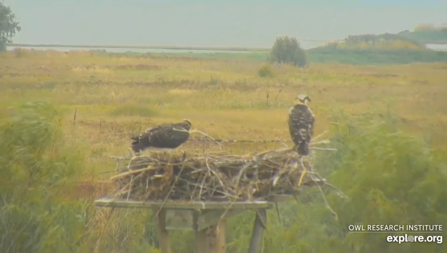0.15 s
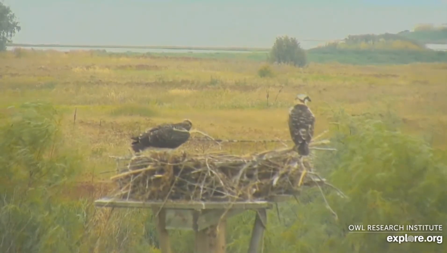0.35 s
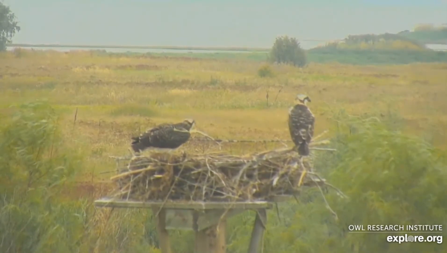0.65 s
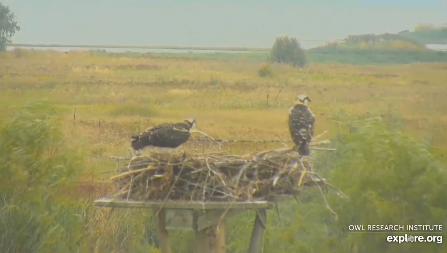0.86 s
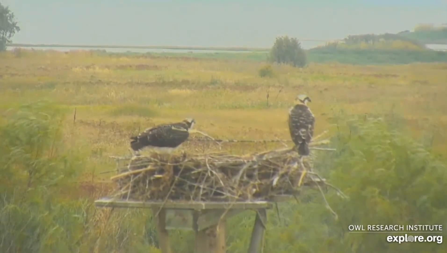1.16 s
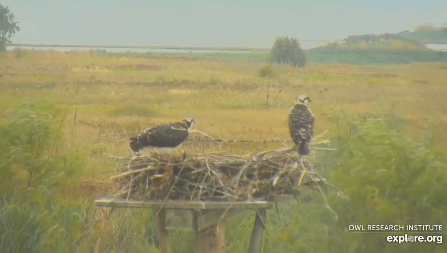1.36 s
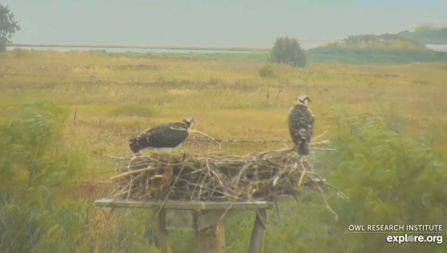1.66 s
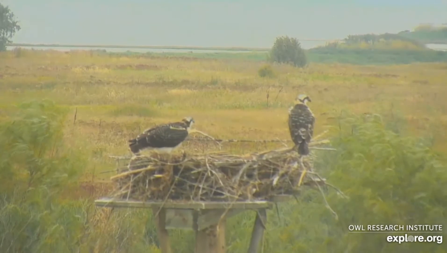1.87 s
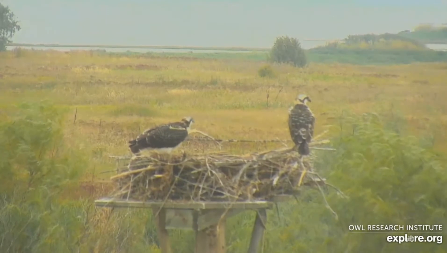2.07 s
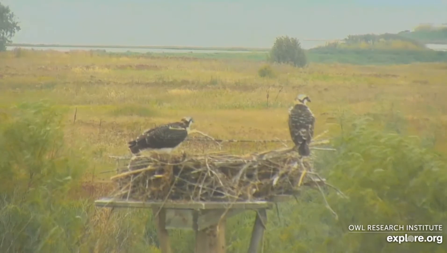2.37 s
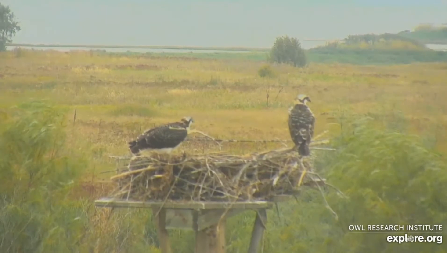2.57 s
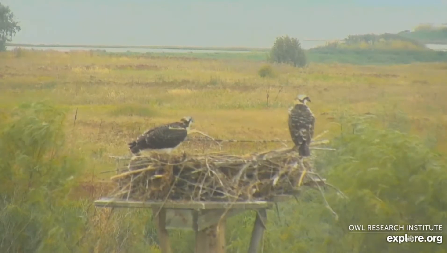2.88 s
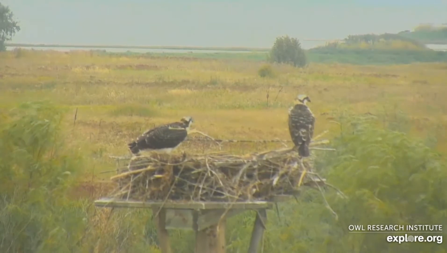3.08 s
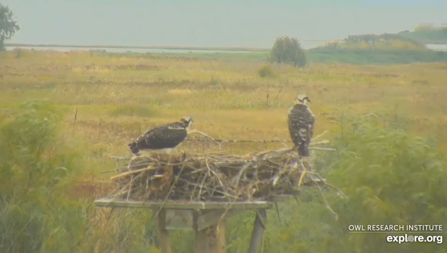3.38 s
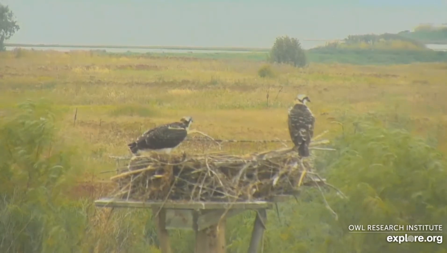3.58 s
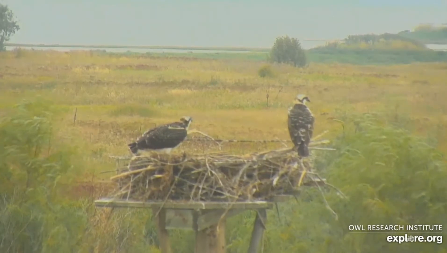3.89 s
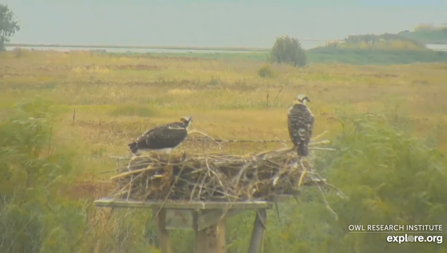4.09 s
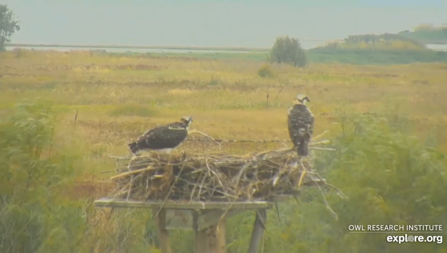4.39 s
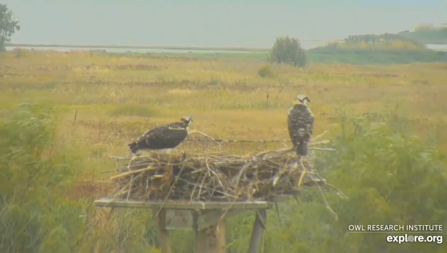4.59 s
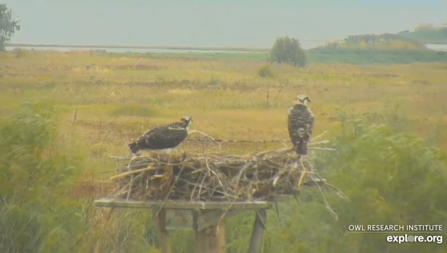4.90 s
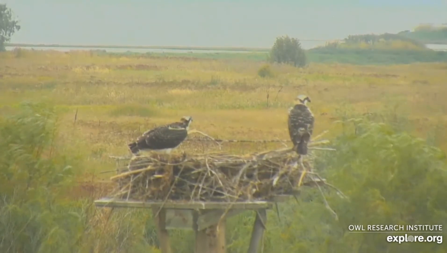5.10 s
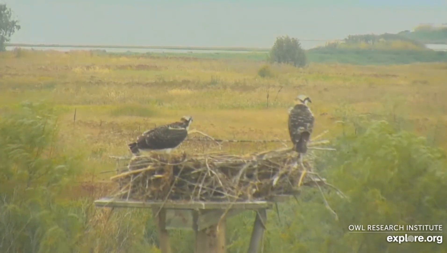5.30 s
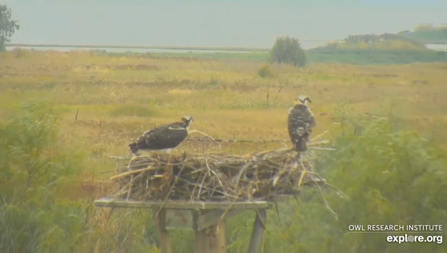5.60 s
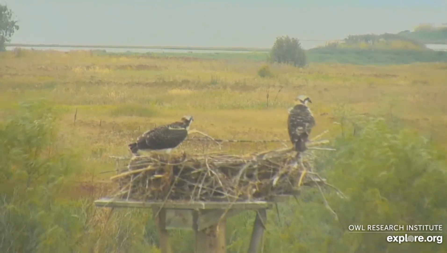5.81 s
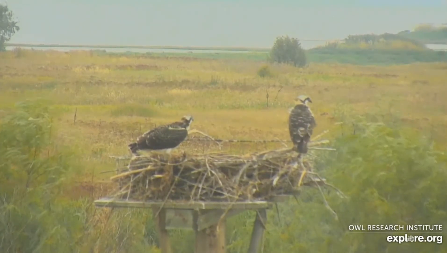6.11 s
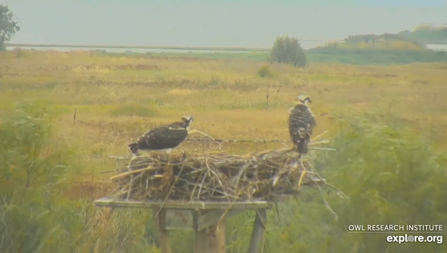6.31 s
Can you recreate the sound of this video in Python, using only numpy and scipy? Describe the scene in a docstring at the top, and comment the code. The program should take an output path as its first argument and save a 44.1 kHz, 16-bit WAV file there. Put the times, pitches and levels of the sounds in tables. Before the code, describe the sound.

A low distant drone and muffled wind buffets begin together, and a bright fluttering chirp follows at once. Similar gliding whistles keep returning at uneven gaps, strong ones answered by softer ones. A faint insect buzzes rapidly around two seconds, and dry nest twigs tick now and then. The wind eases, the hum grows steady and stronger, and light grass hiss remains; open field, single outdoor microphone.

```python
"""A distant motor hum and a gust on the microphone open the scene, and at once a small bird chirps.
Place: a raptor's nest platform in open marsh grass, heard by a fixed outdoor microphone.
The chirps are gliding whistles with faint overtones and an echo tail, repeated from a few set shapes.
An insect trills in falling pulses, nest twigs click, and the steady-pitched low hum, uneven under the early
gusts, swells later. Gusts, grass hiss and far rumble are coloured noises, each with its own level curve."""
import sys
import numpy as np
from scipy import signal
from scipy.fft import rfft, irfft
from scipy.io import wavfile
from scipy.ndimage import uniform_filter1d

SR = 44100
rng = np.random.default_rng(int(sys.argv[2]) if len(sys.argv) > 2 else 0)


def persist_wave(psi):
    """Save psi, clipped to +-1, as 16-bit WAV."""
    counts = np.round(np.clip(psi, -1, 1) * 32767).astype(np.int16)
    wavfile.write(sys.argv[1], SR, np.atleast_2d(counts).T)


N = 284445  # length [samples]


def undb(db):
    """Decibels to amplitude gain."""
    return 10 ** (np.asarray(db, float) / 20)


def curve(table):
    """A (time [s], value) table drawn as straight lines through every sample."""
    s, value = np.transpose(table)
    return np.interp(np.arange(N) / SR, s, value)


def walk(rate, size=N):
    """Random levels held for 1 / rate seconds and smoothed twice; spread near 1."""
    hold = int(SR / rate)
    steps = np.repeat(rng.standard_normal(size // hold + 1), hold)
    smooth = uniform_filter1d(uniform_filter1d(steps, hold), hold)
    return 1.362 * smooth[:size]  # restores the spread lost in smoothing


def noise(spectrum, flicker_db, rate, lo_hz, hi_hz):
    """Coloured noise whose overlapping bands flicker independently; rms 1 between lo_hz and hi_hz."""
    hz = np.fft.rfftfreq(N, 1 / SR) + 1e-3  # keeps the logarithm finite at 0 Hz
    points_hz, points_db = np.transpose(spectrum)
    colour_db = np.interp(np.log(hz), np.log(points_hz), points_db, left=-90, right=-90)
    coloured = rfft(rng.standard_normal(N)) * undb(colour_db)
    out = np.zeros(N)
    for centre in np.arange(4, 15, .5):  # octaves above 1 Hz
        share = np.clip(1 - 2 * abs(np.log2(hz) - centre), 0, 1)  # triangles that sum to one
        band = irfft(coloured * share, N)
        out += band * undb(flicker_db * walk(rate))
    inside = rfft(out) * ((hz > lo_hz) & (hz < hi_hz))
    return out / np.std(irfft(inside, N))


# Chirp shapes, each a list of whistled strokes with rows
# (time after the start [s], pitch before the call's factor [Hz], level relative to the call [dB]);
# a fourth number in a last row is the count of flutter turns that end the stroke
WARBLE = [
    [(.006, 4600, -22), (.013, 4900, -16), (.024, 5200, -14), (.031, 5600, -14), (.034, 5700, -30)],
    [(.010, 5300, -26), (.022, 5650, -17), (.030, 6000, -15), (.034, 6100, -30)],
    [(.032, 3500, -26), (.036, 4000, -11), (.041, 4700, -2), (.048, 4800, -2), (.054, 4470, -5),
     (.059, 4820, -2), (.065, 3680, -3), (.0755, 3600, 0), (.079, 4600, -10), (.087, 2900, -22)],
    [(.089, 2980, -20), (.093, 3140, -7), (.097, 3290, 0), (.103, 3530, -6), (.112, 3740, -9),
     (.117, 3100, -7), (.123, 3000, -5), (.126, 3380, -9, 3)],
]
HIGH_WARBLE = [
    [(.008, 6100, -26), (.018, 5750, -11), (.033, 6250, -16)],
    [(.018, 4800, -24), (.026, 5100, -13), (.033, 5700, -16)],
    [(.033, 3600, -22), (.036, 3880, -5), (.043, 5150, -1), (.050, 5020, 0), (.056, 5380, -2),
     (.062, 4250, -5), (.068, 3720, -2), (.073, 4350, -3), (.082, 3050, -12)],
    [(.082, 3050, -14), (.087, 3400, -5), (.105, 3800, -3), (.112, 3980, -10), (.118, 3700, -7),
     (.131, 2880, -13), (.136, 2800, -26)],
]
BURR = [
    [(.006, 6400, -24), (.016, 6000, -14), (.026, 5450, -13), (.044, 4900, -5), (.052, 4150, -7),
     (.066, 4100, -7), (.080, 4100, -20)],
    [(.030, 3700, -20), (.042, 4250, -3), (.054, 3530, -5), (.070, 3320, -5), (.080, 2900, -14),
     (.089, 3150, -4), (.101, 3280, -2), (.107, 3950, -4), (.114, 3200, -1), (.124, 2920, -6),
     (.150, 2720, -18)],
]
LOW_WARBLE = [
    [(.006, 4400, -24), (.014, 3950, -10), (.028, 4050, -7), (.033, 4250, -10), (.038, 3900, -24)],
    [(.036, 2900, -20), (.048, 3050, -5), (.066, 3560, -6), (.072, 3280, -5), (.086, 3330, 0),
     (.092, 2950, -7), (.100, 2750, -6), (.107, 3300, -7, 2)],
]
BROKEN_WARBLE = [
    [(.012, 3300, -22), (.024, 4750, -16), (.038, 4400, -16), (.045, 3400, -16), (.056, 3500, -14),
     (.064, 3000, -20)],
    [(.068, 3300, -16), (.072, 3450, -2), (.086, 3400, 0), (.096, 2800, -6), (.104, 2800, -4),
     (.108, 3250, -7, 2)],
]
SLIDE = [
    [(.000, 2600, -16), (.008, 2650, -2), (.028, 3050, 0), (.036, 3050, -4), (.042, 2900, -20)],
]
# Calls at the nest: (start time [s], shape, level [dB], pitch factor,
# treble lean [dB per octave over 4 kHz, for one octave], hoarseness [0-1], echo relative to the call [dB])
CHIRPS = [(0.0739, WARBLE, -26.5, 1, -5, 0.14, -10), (0.683, HIGH_WARBLE, -34, 1, 1.5, 0.23, -8.5),
          (0.9602, BROKEN_WARBLE, -37.5, 1, .1, .3, -10), (1.2974, WARBLE, -28, 0.99, -2, 0.26, -8),
          (1.730, SLIDE, -54, 1.14, .1, .2, -10), (2.431, WARBLE, -29.5, 0.99, -6, 0.31, -9.5),
          (2.5817, HIGH_WARBLE[2:], -36, 1, -39, 0.28, -10), (2.9007, LOW_WARBLE, -45.5, 0.99, 8, 0.84, -1),
          (3.110, SLIDE, -46.5, 0.98, .1, 0.02, -6), (3.2197, BURR, -39, 1, -2, .7, 1.5),
          (3.756, WARBLE, -30, 1, 1, 0.18, -9), (3.9988, HIGH_WARBLE, -41, 1.01, -11, 0.2, -6),
          (4.198, BROKEN_WARBLE[1:], -48, .97, .1, 0.28, -6), (4.7984, WARBLE, -26.5, 1, 3, 0.23, -10),
          (5.0798, LOW_WARBLE, -39, 1.02, 10, 0.4, -20), (5.3703, BURR, -39, 1, -1, .5, .1),
          (5.618, HIGH_WARBLE[2:3], -41.5, 1.04, -16, 0.4, -10),
          (5.9892, WARBLE, -29.5, 0.99, 8, 0.14, -7.5)]


def birds():
    """Small birds whistle the set shapes, each call at its moment and level."""
    out = np.zeros(N + SR)
    for s, shape, db, pitch, lean_db, hoarse, echo_db in CHIRPS:
        call = chirp(shape, pitch, lean_db, hoarse, echo_db)
        start = int(s * SR)
        out[start:start + len(call)] += undb(db) * call
    return out[:N]


# Second and third partials of the whistle, before fast glides lift them: (level [dB], level [dB])
OVERTONES_DB = (-37, -41)
ECHO_T60_S = .28


def chirp(shape, pitch, lean_db, hoarse, echo_db):
    """Gliding whistles; hoarseness shakes pitch and level; nest and grass scatter the call as a noise tail."""
    t = np.arange(int(.45 * SR)) / SR
    out = np.zeros(len(t))
    for stroke in shape:
        s, glide, db = np.transpose(stroke[:-1] + flutter(*stroke[-1]))
        # softly sung strokes are the least steady
        shake = hoarse + .15 * (max(db) < -8)
        smooth_hz = uniform_filter1d(np.interp(t, s, pitch * glide), size=40)
        hz = smooth_hz * (1 + .06 * shake * walk(450, size=len(t)))
        # negative lean softens the part of a call above 4 kHz, positive lean brightens it
        lean = lean_db * np.clip(np.log2(hz / 4000), 0, 1)
        level_db = np.interp(t, s, db, left=-90, right=-90) + lean
        gain = uniform_filter1d(undb(level_db + 4 * shake * walk(300, size=len(t))), size=40)
        phase = 2 * np.pi * np.cumsum(hz) / SR
        # overtones flare in fast glides: 1 dB per 12000 Hz/s, up to 13 dB
        glide_speed = abs(np.gradient(np.interp(t, s, glide))) * SR
        lift = undb(np.clip(glide_speed / 12000, 0, 13))
        overtones = sum(undb(d) * np.sin((k + 2) * phase) for k, d in enumerate(OVERTONES_DB))
        out += np.sqrt(2) * gain * (np.sin(phase) + lift * overtones)
    decay = np.exp(-np.log(1000) * t / ECHO_T60_S)
    tail = rng.standard_normal(len(t)) * decay * np.clip(t / 0.0019, 0, 1)
    # a distant, hoarse call arrives by many short paths
    tail *= 1 + 2.5 * hoarse * np.exp(-t / .012)
    echo = signal.fftconvolve(out, tail / np.linalg.norm(tail))[:len(t)]
    return out + undb(echo_db) * echo


FLUTTER_S, FLUTTER_DROP_HZ = .0105, 700  # one turn; trough under crest, before the pitch factor
FLUTTER_FADE_DB, FLUTTER_DIP_DB = -4, -8  # per turn; trough relative to its crest


def flutter(s, hz, db, count=0):
    """The fading shiver that ends a warble: crests and lower, softer troughs; a plain point if no turns."""
    crests = [(s + k * FLUTTER_S, hz, db + k * FLUTTER_FADE_DB) for k in range(max(count, 1))]
    troughs = [(s + FLUTTER_S / 2, hz - FLUTTER_DROP_HZ, db + FLUTTER_DIP_DB)
               for s, _, db in crests[:count]]
    return sorted(crests + troughs)


# Insect trill as the peak of the tone at pulse height, before the overall gain of 6 dB: (time [s], level [dB])
TRILL = [(1.47, -70), (1.56, -54), (1.9, -54), (2.12, -56), (2.25, -62), (2.45, -66)]
TRILL_RATE_HZ, TRILL_FIRST_S = 38.93, 1.530  # wing strokes per second; the centre of one stroke
TRILL_HZ, TRILL_FALL_HZ = 3930, 220  # pitch at mid stroke; fall over 0.3 of a stroke period


def insect():
    """Even wing strokes, each a short tone that slides down."""
    t = np.arange(N) / SR
    stroke = ((t - TRILL_FIRST_S) * TRILL_RATE_HZ + .5) % 1 - .5  # periods from the pulse centre
    hz = TRILL_HZ - TRILL_FALL_HZ * stroke / .3 + 25 * walk(30)
    pulse = np.exp(-(stroke / .19) ** 2)
    level_db = curve(TRILL) - 60 * (t > TRILL[-1][0])  # 60 dB down after the last row
    tone = np.sin(2 * np.pi * np.cumsum(hz) / SR)
    return 2 * undb(level_db + 1.2 * walk(40)) * pulse * tone


# Twig ticks of the nest: (time [s], level before decay [dB], pitch [Hz])
TICKS = [(1.6671, -30, 7620), (2.911, -28, 8370), (4.727, -29, 8650)]


def ticks():
    """Dry twigs of the nest click: high tones that die in a fraction of a millisecond."""
    out = np.zeros(N + SR)
    t = np.arange(300) / SR
    for s, db, hz in TICKS:
        start = int(s * SR)
        out[start:start + len(t)] += undb(db) * np.exp(-t / .00012) * np.sin(2 * np.pi * hz * t)
    return out[:N]


# Distant motor, rms of its fundamental at the microphone: (time [s], level [dB])
HUM = [(0.0, -31), (0.45, -34.5), (0.54, -40), (0.64, -39.5), (1.0, -35), (1.5, -46), (1.9, -33.5),
       (2.0, -36.5), (2.24, -32), (2.4, -35.5), (3.08, -26.5), (3.35, -29), (3.5, -26), (4.3, -26),
       (5.3, -24), (6.45, -22.5)]
# Faint partials of the motor: (multiple of the fundamental, rms level [dB])
HUM_PARTIALS = [(3, -62.5), (12, -68), (16, -65.5), (22, -68)]
HUM_HZ = 110.77


def hum():
    """A nearly pure low drone of uneven level that grows stronger, with a few faint partials."""
    phase = 2 * np.pi * np.cumsum(HUM_HZ + 0.148 * walk(2)) / SR
    fundamental = undb(curve(HUM) + 0.44 * walk(9)) * np.sin(phase)
    partials = sum(undb(db + 2.8 * walk(3.19)) * np.sin(k * phase) for k, db in HUM_PARTIALS)
    return np.sqrt(2) * (fundamental + partials)


# Gusts on the microphone, rms from 127 to 233 Hz: (time [s], level [dB])
GUST = [(0.0, -39.5), (0.14, -42.5), (0.27, -34), (0.38, -52.5), (0.75, -34), (0.86, -41.5), (1.1, -34.5),
        (1.45, -40), (1.62, -36.5), (1.74, -27.5), (1.87, -43.5), (2.24, -55), (2.34, -33.5), (2.44, -42),
        (2.7, -29), (2.78, -46), (3.12, -36), (3.38, -52.5), (3.54, -42.5), (3.9, -47), (3.99, -44),
        (4.1, -65), (4.92, -41.5), (5.25, -49), (6.45, -60)]
# Colour of the buffeting: (frequency [Hz], relative level per Hz [dB])
BUFFET = [(25, -30), (45, -12), (70, -9), (100, 11), (140, 8.5), (200, 1.5), (300, -9.5), (450, -39)]


def gusts():
    """Wind buffets the microphone: low noise with strongly flickering bands."""
    return undb(curve(GUST)) * noise(BUFFET, flicker_db=4.0, rate=14, lo_hz=127.0, hi_hz=233)


# Breeze in the grass, rms from 5.5 to 9 kHz: (time [s], level [dB])
BREEZE = [(0.0, -57.5), (2.21, -59), (3.36, -55), (3.68, -53.5), (6.45, -53)]
# Colour of the grass hiss: (frequency [Hz], relative level per Hz [dB])
GRASS = [(1000, -3.5), (2000, -2), (3000, 1), (5000, -0.5), (7000, -5), (9000, -9), (12000, -18.5),
         (16000, -28)]


def grass():
    """The breeze makes the grass hiss: high noise that flickers slightly."""
    return undb(curve(BREEZE)) * noise(GRASS, flicker_db=.6, rate=10, lo_hz=5500, hi_hz=9000)


# Slow swell of the far marsh, rms from 300 to 1500 Hz: (time [s], level [dB])
MARSH_DB = [(0.0, -44.5), (1.35, -42), (5.19, -41.5), (6.45, -43)]
# Colour of the far rumble and hiss: (frequency [Hz], relative level per Hz [dB])
MARSH = [(20, -10), (40, -15.5), (80, 9), (150, -3), (290, 0.5), (630, -1.5), (870, -4.5), (1080, -10),
         (1310, -14), (2200, -21), (4050, -22.5), (8000, -48), (12000, -34), (16500, -36)]


def marsh():
    """Far rumble and hiss behind everything: nearly steady noise, strongest in the low range."""
    return undb(curve(MARSH_DB)) * noise(MARSH, flicker_db=.4, rate=6, lo_hz=300, hi_hz=1500)


def scene():
    """Birds, insect, twigs and hum over wind, grass and far rumble, on one channel."""
    foreground = birds() + insect() + ticks()
    background = hum() + gusts() + grass() + marsh()
    return (foreground + background)[None]


TOP_HZ = 15710


def record(dry):
    """The recorder cuts the top steeply: an elliptic low-pass, 0.2 dB ripple and 80 dB rejection."""
    return signal.sosfilt(signal.ellip(12, .2, 80, TOP_HZ, fs=SR, output="sos"), dry)


dry = scene()
out = record(dry)
persist_wave(out)
```